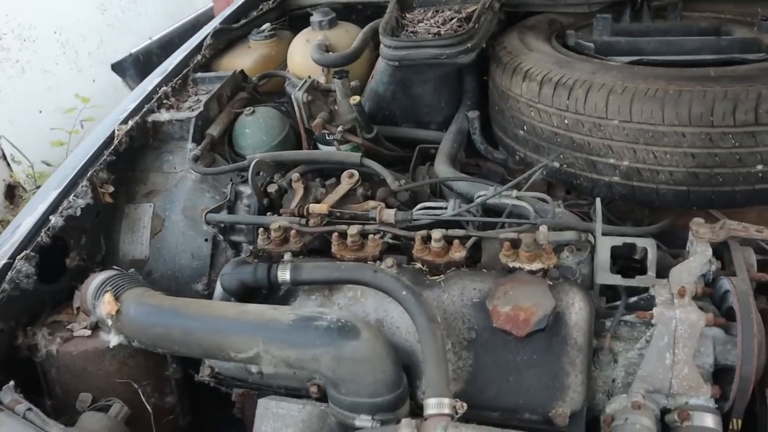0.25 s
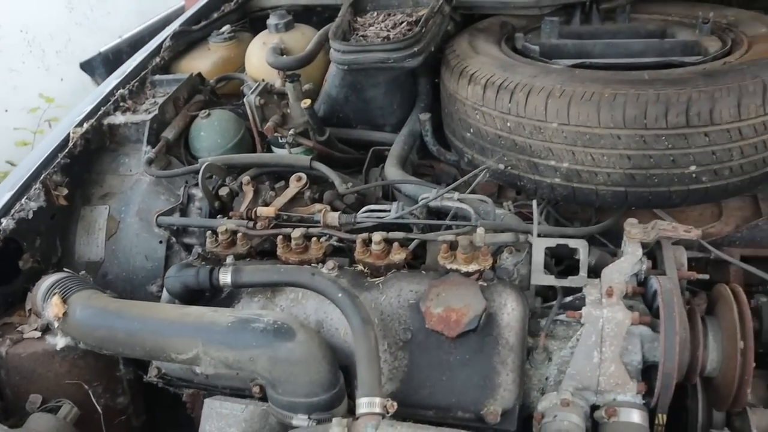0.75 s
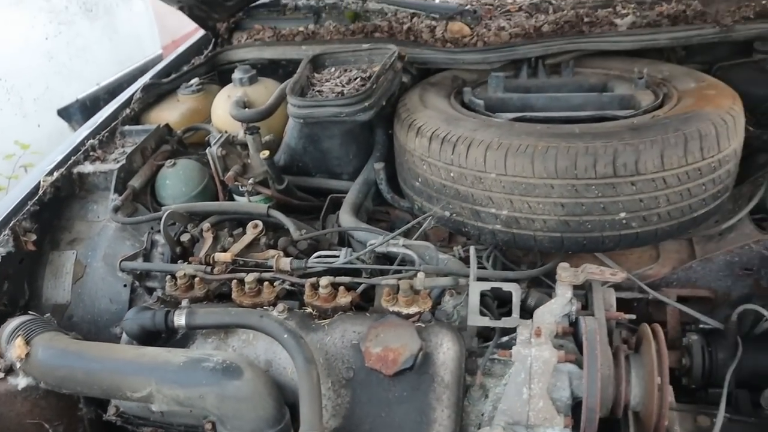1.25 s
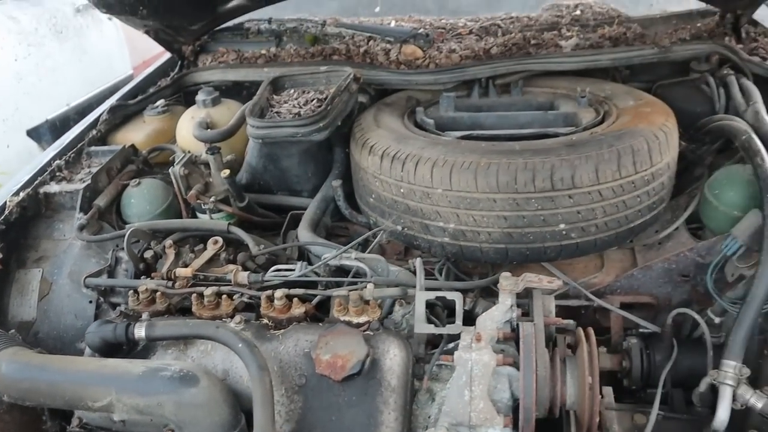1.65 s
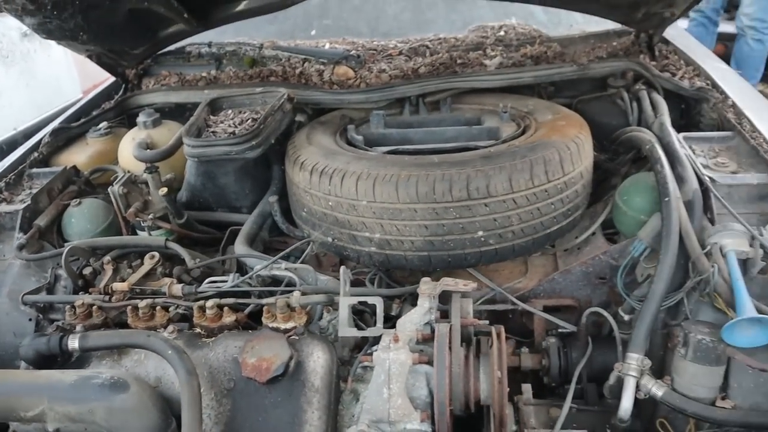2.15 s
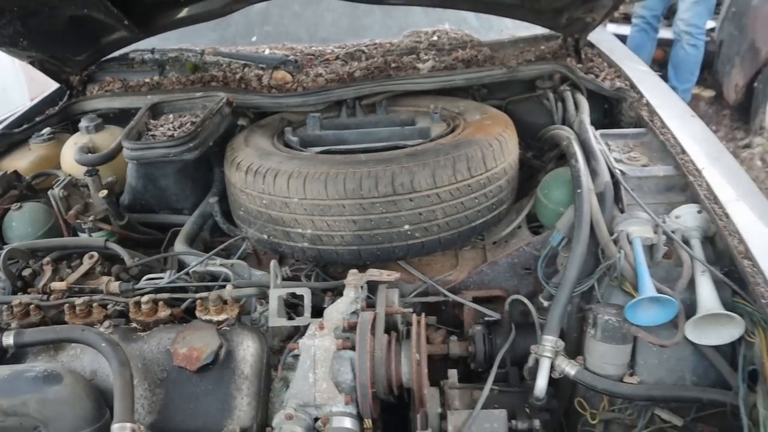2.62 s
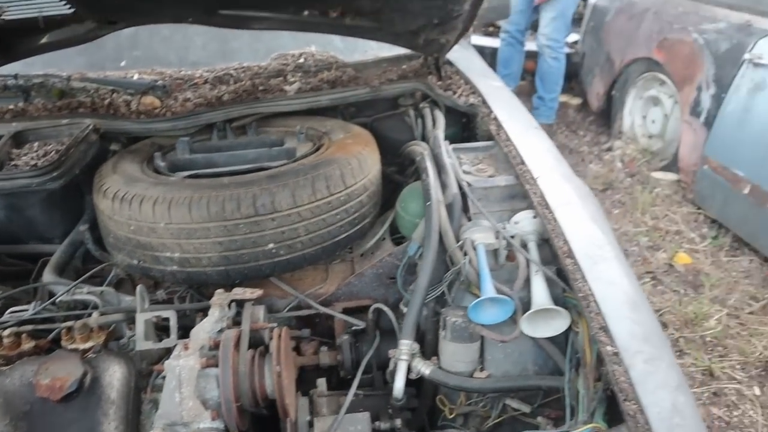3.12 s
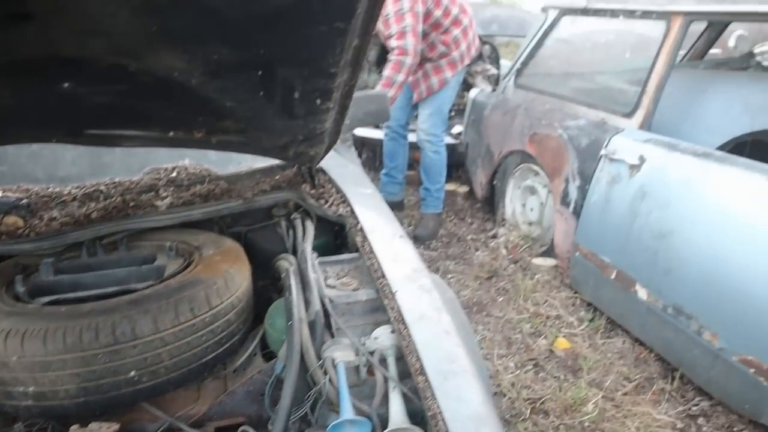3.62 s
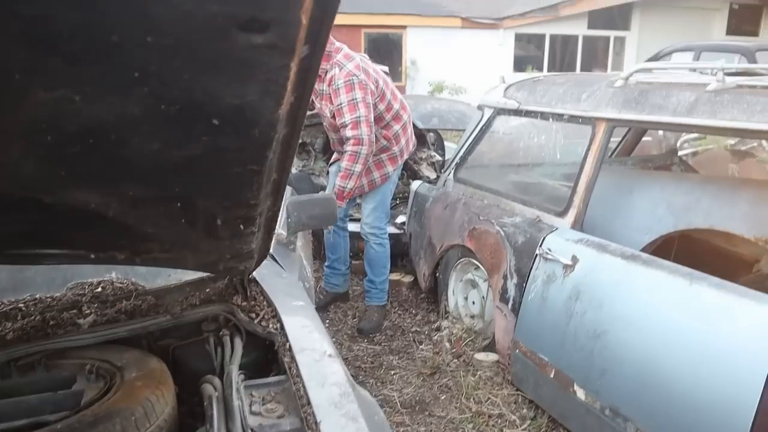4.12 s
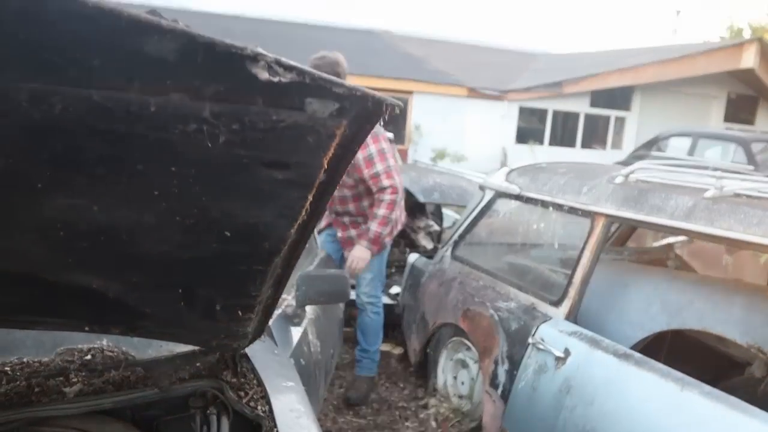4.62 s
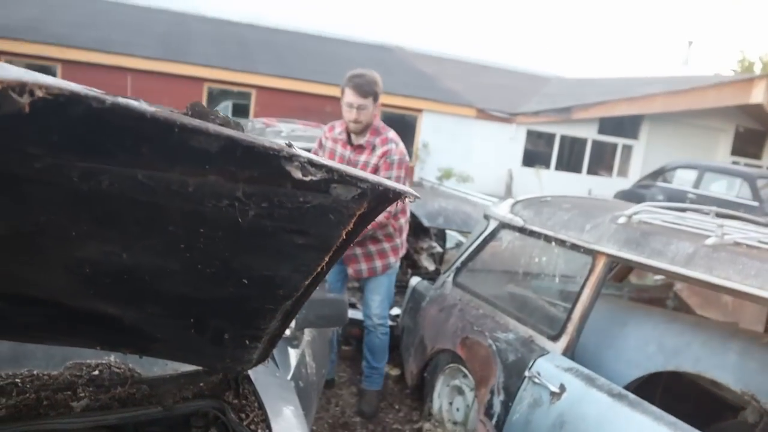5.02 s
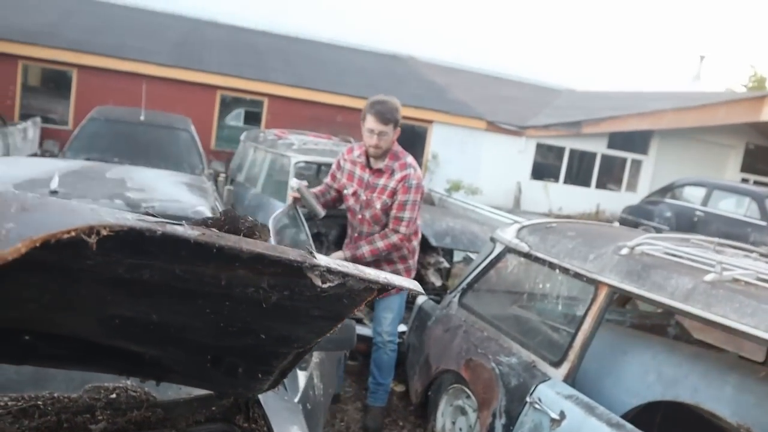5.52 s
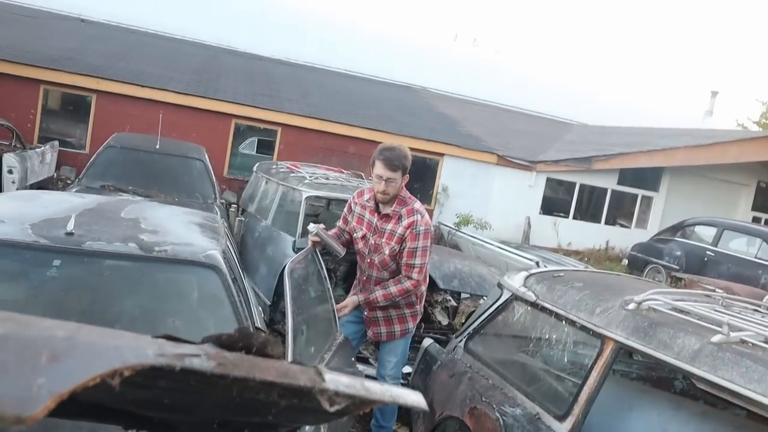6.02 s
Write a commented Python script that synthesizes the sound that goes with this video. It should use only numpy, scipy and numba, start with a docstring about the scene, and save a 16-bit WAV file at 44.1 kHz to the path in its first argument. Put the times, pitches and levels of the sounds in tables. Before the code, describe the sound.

In a quiet yard, a person wrestles a rusty car door, with hollow sheet-metal knocks, scuffs, one brief squeak, grassy steps and faint traffic rumble.

```python
"""Stiff car door in a yard

An old car door is worked open outdoors, a few metres away. Noise bursts of latch and hinge contacts ring
decaying sheet-metal modes; footfalls are soft resonant bumps with a crunch of dry grass. The hinge squeaks
once as a gliding tone with overtones, a dragging seal hisses as grainy filtered noise, grit ticks, and a far
bird and thin chirps whistle. Walls return a dull echo over the shaped noise of distant traffic."""
import sys
import numpy as np
from scipy import signal
from scipy.fft import rfft, irfft
from scipy.io import wavfile
from scipy.ndimage import uniform_filter1d
from numba import njit

SR = 44100
rng = np.random.default_rng(int(sys.argv[2]) if len(sys.argv) > 2 else 0)


def makeup_ratio(level_db):
    """Linear amplitude ratio for a level in decibels (20 dB per factor of ten)."""
    decades = np.asarray(level_db, float) / 20
    return 10 ** decades


def int16_out(signal):
    """Quantize to a 16-bit WAV file."""
    q = np.round(np.clip(np.atleast_2d(signal).T, -1, 1) * 32767)
    wavfile.write(sys.argv[1], SR, q.astype(np.int16))


N = 276066
T = np.arange(N) / SR


def unit(x):
    """Scale to rms 1."""
    return x / np.sqrt(np.mean(x ** 2))


def at_peak(x, db):
    """Scale by the loudest 9 ms: a steady sine there would peak at db."""
    return x * makeup_ratio(db) / np.sqrt(2 * uniform_filter1d(x ** 2, size=400).max())


def add(out, s, x):
    """Mix x in from time s."""
    i = int(s * SR)
    out[i:i + len(x)] += x[:N - i]


def colour(x, points):
    """Shape a noise by (Hz, dB) points, joined along log frequency."""
    hz, db = np.transpose(points)
    f = np.maximum(np.arange(len(x) // 2 + 1) * SR / len(x), 1)
    gain = makeup_ratio(np.interp(np.log(f), np.log(hz), db, left=-120))
    return irfft(rfft(x) * gain, len(x))


def band(x, hz, width):
    """Resonant band-pass."""
    return signal.lfilter(*signal.iirpeak(hz, hz / width, fs=SR), x)


def duller(x, hz, order):
    """Low-pass."""
    return signal.sosfilt(signal.butter(order, hz, fs=SR, output="sos"), x)


def decay(t, t60):
    """Exponential fall by 60 dB in t60 seconds."""
    return np.exp(-np.log(1000) * t / t60)


def walk(rate):
    """Slow random wander, smoothed from rate new values a second."""
    k = int(SR / rate)
    steps = np.repeat(rng.standard_normal(N // k + 1), k)
    return 1.3 * uniform_filter1d(uniform_filter1d(steps, k), k)[:N]


def level_curve(s, db):
    """Gain through (s, dB) points, silent outside them."""
    return makeup_ratio(np.interp(T, s, db, left=-120, right=-120))


def tone(table, orders):
    """A gliding pitch with overtones: the running sum of frequency gives the phase."""
    s, hz, db = np.transpose(table)
    phase = 2 * np.pi * np.cumsum(np.interp(T, s, hz)) / SR
    return level_curve(s, db) * sum(makeup_ratio(d) * np.sin(round(k) * phase) for k, d in orders)


def burst(t, rise, spread, grit):
    """Uneven contacts under a rise and a fall; rise is a fraction of the fall time spread, grit is in dB."""
    spread = max(spread, .001)
    shape = (1 - np.exp(-t / (rise * spread))) ** 2 * np.exp(-t / spread)
    return shape * rng.standard_normal(len(t)) * makeup_ratio(grit * rng.standard_normal(len(t)))


# Bands of the four layers of a blow: thud, panel, clank, crack.
# Each row: low edge in Hz, high edge in Hz.
LAYER_BANDS = [(72, 320), (300, 1450), (1450, 4000), (3800, 15000)]


def within(x, layer):
    """Keep one layer's band."""
    lo, hi = LAYER_BANDS[layer]
    high = signal.sosfilt(signal.butter(4, lo, "high", fs=SR, output="sos"), x)
    return duller(high, hi, order=2)


def echo(x, db, t60):
    """Walls and car sides return a dull wash: a softly starting, decaying noise tail."""
    t = T[:SR // 2]
    tail = rng.standard_normal(len(t)) * decay(t, t60) * (1 - np.exp(-t / 0.0043))
    tail = duller(tail, 2340, order=1)
    return makeup_ratio(db) * signal.fftconvolve(x, tail / np.sqrt(np.sum(tail ** 2)))[:N]


# Spectrum of the yard's background noise.
# Each row: frequency in Hz, relative power density in dB.
YARD_SPECTRUM = [(15, -44), (25, 3.5), (89, -2.5), (129, -11.5), (204, -1.5), (289, -6.5), (631, -9),
                 (684, -7), (997, -4.5), (2230, -17.5), (3260, -25), (3630, -26.5), (15500, -33.5)]
# Swell of the distant traffic. Each row: time in seconds, gain in dB.
TRAFFIC_SWELL = [(0, 0), (1, -0.5), (2, -1), (3, 0.5), (4, 0.5), (5, 0.5), (6.26, 2)]


def yard():
    """Distant traffic, the noise below 3 kHz, swells gently; the microphone hiss above it stays even."""
    noise = unit(colour(rng.standard_normal(N), YARD_SPECTRUM)) * makeup_ratio(-43.5)
    traffic = duller(noise, 3000, order=2)
    swell_db = np.interp(T, *np.transpose(TRAFFIC_SWELL)) + 0.2 * walk(12)
    return noise + traffic * (makeup_ratio(swell_db) - 1)


# Far bird's whistle. Each row: time in seconds, pitch in Hz, level in dB before the wavering.
BIRD_WHISTLE = [(3.7, 3310, -71), (3.8, 3270, -64), (3.93, 3220, -63), (4.04, 2990, -61), (4.15, 2940, -61),
                (4.19, 2930, -71)]


def bird():
    """A far whistle, one gliding sine, wavers in the moving air."""
    return tone(BIRD_WHISTLE, [(1, 0)]) * makeup_ratio(2.5 * walk(50))


# Two thin high chirps in the grass. Each row: time in seconds, pitch in Hz, level in dB before the wavering.
GRASS_CHIRPS = [(2.7, 11850, -72), (2.72, 11900, -59), (2.75, 11850, -62), (2.77, 11550, -74),
                (2.79, 12050, -64), (2.835, 12000, -63), (2.86, 11500, -70)]


def chirps():
    """Thin gliding sines high in the treble waver in the moving air."""
    return tone(GRASS_CHIRPS, [(1, 0)]) * makeup_ratio(2.5 * walk(50))


# Soft bumps and footfalls.
# Each row: start in seconds, bump level in dB, centre in Hz, crunch level in dB, fall time in seconds.
SOFT_BUMPS = [(1.49, -37, 406, -74, 0.022), (1.915, -40, 745, -62, 0.0083),
              (2.408, -35.5, 1010, -65, 0.0085), (2.424, -31.5, 1020, -64, 0.0081),
              (2.447, -34.5, 1200, -44.5, 0.011), (2.458, -37.5, 405, -60, 0.021),
              (2.575, -35.5, 363, -64, 0.017), (2.791, -32.5, 900, -61, 0.021),
              (2.821, -33.5, 414, -53, 0.0071), (2.896, -38.5, 385, -49.5, 0.018),
              (2.98, -32.5, 400, -48, 0.019), (3.032, -36.5, 463, -70, 0.011),
              (3.351, -35.5, 327, -64, 0.017), (3.499, -41, 500, -44.5, 0.011),
              (4.01, -36.5, 910, -58, 0.034), (4.037, -46, 850, -41, 0.0044),
              (4.555, -30, 335, -44.5, 0.02), (5.149, -42, 1310, -47, 0.03), (6.228, -38, 816, -56, 0.0042)]


def bumps():
    """Each soft contact has one broad resonance, a thud in the ground and a crunch of dry grass."""
    out, t = np.zeros(N), T[:8192]
    for s, db, hz, crunch_db, spread in SOFT_BUMPS:
        contacts = burst(t, 0.27, spread, 5.6)
        thud_db = db - 8.5 - 5 * np.log2(hz / 400)  # higher bumps thud less, by 5 dB an octave
        bump = band(band(contacts, hz, hz / 3), hz, hz / 0.59)
        thud = band(within(contacts, 0), 132, 37)
        crunch = band(contacts, 2000, 3800)
        for part, part_db in ((bump, db), (thud, thud_db), (crunch, crunch_db)):
            add(out, s, at_peak(part, part_db))
    return out


# Tiny dry ticks. Each row: start in seconds, peak level in dB, centre in Hz.
DRY_TICKS = [(0.0574, -39, 7000), (0.226, -40, 3700), (0.3301, -41, 4240), (1.551, -31, 10400),
             (1.559, -32, 8600), (3.5498, -39, 4690), (3.841, -43, 4760), (4.777, -34, 8760),
             (4.8352, -31, 12500), (5.2374, -40, 8400), (5.9396, -34.5, 7700), (6.048, -35, 8400),
             (6.064, -41, 3680), (6.1, -40, 8400), (6.172, -28.5, 8240)]


def ticks():
    """Grit snaps: a millisecond or so of noise in a wide resonance."""
    out, t = np.zeros(N), T[:1024]
    # six faint ones scattered by chance: -47 to -43 dB, half an octave either side of 5 kHz
    faint = [(a * T[-1], -47 + 4 * b, 5000 * 2 ** (c - .5)) for a, b, c in rng.random((6, 3))]
    for s, db, hz in DRY_TICKS + faint:
        snap = band(rng.standard_normal(len(t)) * np.exp(-t / 0.0016), hz, hz / 4.8)
        add(out, s, snap * makeup_ratio(db) / np.abs(snap).max())
    return out


# The dragging seal sets in, presses harder, lets go and trails off.
# Each row: time in seconds, level in dB.
SEAL_PRESSURE = [(4.82, -60), (4.84, -49.5), (4.9, -45), (5.02, -45.5), (5.158, -33.5), (5.168, -54),
                 (5.4, -55.5)]
# Resonances of the seal's hiss.
# Each row: centre in Hz, width of the first of two filters in Hz, gain in dB before the hiss is levelled.
SEAL_RESONANCES = [(8220, 2100, -9), (11100, 3500, -11), (4070, 9300, -12.5)]


def drag():
    """The seal's fine stick-slip grains and sudden slips sound in broad high resonances."""
    slips_per_s, slip_db, slip_s = 120, -1, .002  # slip_s is the decay time
    slips = (rng.random(N) < slips_per_s / SR) * rng.exponential(size=N)
    slips = signal.lfilter([1], [1, -np.exp(-1 / (slip_s * SR))], slips)
    grains = rng.standard_normal(N) * makeup_ratio(1.5 * walk(40)) * (1 + makeup_ratio(slip_db) * slips)
    hiss = sum(makeup_ratio(d) * band(band(grains, hz, w), hz, 1.56 * w) for hz, w, d in SEAL_RESONANCES)
    return unit(hiss) * level_curve(*np.transpose(SEAL_PRESSURE))


# Hinge squeak. Each row: time in seconds, pitch in Hz, level in dB before the overtone gains.
HINGE_GLIDE = [(3.193, 2220, -42), (3.2, 2260, -17.5), (3.2065, 2262, -17), (3.2125, 2390, -23),
               (3.217, 2230, -22), (3.227, 2050, -29), (3.234, 1960, -48)]
# Overtones of the squeak. Each row: multiple of the pitch, gain in dB.
HINGE_OVERTONES = [(1, -0.5), (2, -19.5), (3, -20.5), (4, -28.5), (5, -30)]
# Reflections of the squeak. Each row: delay in seconds, gain in dB before dulling.
HINGE_REFLECTIONS = [(.01323, -5), (.030, -14), (.045, -16), (.062, -21), (.12, -28), (.138, -27),
                     (.157, -21), (.18, -28)]


def squeak():
    """The gliding squeak beats against its first reflection and hangs in the yard as a thin wash."""
    direct = tone(HINGE_GLIDE, HINGE_OVERTONES)
    slaps = np.zeros(N)
    for s, db in HINGE_REFLECTIONS:
        dulled = duller(direct, 5000 if s < .02 else 2800, order=2)  # later reflections are duller
        slaps += makeup_ratio(db) * np.roll(dulled, int(s * SR))
    return direct + slaps + echo(direct, db=-24, t60=.35)


# Modes of the door panel and latch, before each blow's scatter.
# Each row: frequency in Hz, relative level in dB, 60 dB decay time in seconds.
PANEL_MODES = [(90.1, 1.5, 0.16), (144.8, 3.5, 0.12), (236.3, 5, 0.084), (295, -8, 0.13),
               (432.7, -0.5, 0.078), (498, -3.5, 0.066), (586, -7.5, 0.049), (684, -0.5, 0.043),
               (753.5, 7.5, 0.032), (832.6, -1.5, 0.12), (959.6, -5.5, 0.1), (1075, -3.5, 0.021),
               (1310, -3, 0.038), (1457, -3.5, 0.034), (1541, 5, 0.045), (1840, 3.5, 0.023),
               (1962, 4, 0.04), (2095, 0.5, 0.038), (2287, -2.5, 0.04), (2828, 6.5, 0.0097),
               (3000, 4.5, 0.0055), (3565, 4, 0.015)]
# Crowd of unresolved modes in the thud, panel and clank bands.
# Each row: starting level in dB, 60 dB decay time in seconds.
MODE_CROWD = [(2, 0.3), (4, 0.1), (8, 0.026)]


def panel_rings(scatter_db):
    """Thud, panel and clank responses to one contact; each blow lands elsewhere and bends the sheet a little."""
    t = T[:16384]
    hz, db, t60 = np.array(PANEL_MODES).T[:, :, None]
    spot, bend, turn = rng.standard_normal((3, len(PANEL_MODES), 1))
    bent_hz = hz * (1 + 0.026 * bend)
    rings = makeup_ratio(db + scatter_db * spot) * np.sin(2 * np.pi * bent_hz * t) * decay(t, t60)
    rings = rings * np.sign(turn)  # each mode starts in or out of phase
    layer_of = np.digitize(hz[:, 0], [LAYER_BANDS[1][0], LAYER_BANDS[2][0]])
    responses = []
    for layer, (crowd_db, crowd_t60) in enumerate(MODE_CROWD):
        crowd = unit(within(rng.standard_normal(len(t)), layer)) * makeup_ratio(crowd_db) * decay(t, crowd_t60)
        responses.append(within(rings[layer_of == layer].sum(axis=0) + crowd, layer))
    return responses


# The door shudders on its hinges.
# Each row: start of the hold in seconds, hold in seconds, thud level in dB, panel level in dB.
HINGE_SHUDDERS = [(0.503, 0.05, -52, -32), (0.66, 0.16, -35, -40), (1.56, 0.015, -42, -43.5),
                  (1.73, 0.15, -44.5, -48.5), (3.493, 0.03, -37.5, -41), (4.203, 0.17, -42, -34),
                  (4.42, 0.12, -42.5, -45)]


def shudders():
    """Rough rubbing sets in, holds and dies away in the low and middle modes."""
    rise_db_per_s, fall_db_per_s = 600, 152
    rub = rng.standard_normal(N) * makeup_ratio(1.6 * walk(55))
    thud, panel = (unit(signal.fftconvolve(rub, ring)[:N]) for ring in panel_rings(0)[:2])
    out = np.zeros(N)
    for s, hold, thud_db, panel_db in HINGE_SHUDDERS:
        rise_db = rise_db_per_s * np.minimum(T - s, 0)
        fall_db = fall_db_per_s * np.maximum(T - s - hold, 0)
        out += makeup_ratio(rise_db - fall_db) * (thud * makeup_ratio(thud_db) + panel * makeup_ratio(panel_db))
    return out


def blows(table, rise, grit, first_db, heavy_s):
    """A first contact, its rebound and chatter ring the panel, with a noisy crack on top."""
    out, t = np.zeros(N), T[:16384]
    for s, panel_db, thud_db, clank_db, crack_db, spread in table:
        contacts = burst(t, rise, spread, grit)
        # only the early, heavy contacts move the large low modes
        heavy = contacts * np.exp(-t / heavy_s)
        heavy[:12] += makeup_ratio(first_db) * np.hanning(12)
        # every blow springs back once, 6.89 ms later
        rebound = burst(t, rise, spread, grit) * np.exp(-t / heavy_s)
        add(heavy, 0.00689, makeup_ratio(-3) * rebound[:8192])
        # loose parts start to rattle a moment later
        light = contacts * (1 - np.exp(-t / 0.0032))
        pushes = zip((heavy, heavy, light), panel_rings(3.2))
        thud, panel, clank = (signal.fftconvolve(push, ring)[:len(t)] for push, ring in pushes)
        crack = duller(within(light, 3), 5850, order=1)
        # a soft blow that hardly clanks also leaves the upper panel modes quiet
        soft_hz = np.clip(1630 * 2 ** ((clank_db - panel_db + 23.5) / 16), 400, 8000)
        panel = duller(panel, soft_hz, order=2)
        for part, part_db in ((thud, thud_db), (panel, panel_db), (clank, clank_db), (crack, crack_db)):
            add(out, s, at_peak(part, part_db))
    return out


# The latch knocks against the panel. Each row: start in seconds, panel level in dB, clank level in dB,
# crack level in dB, chatter fall time in seconds.
LATCH_KNOCKS = [(0.636, -33, -47, -41.5, 0.0036), (0.706, -4.5, -15.5, -19.5, 0.0072),
                (0.725, -18.5, -43, -41, 0.0065), (0.771, -18, -25, -22.5, 0.0044),
                (1.015, -26.5, -32, -53, 0.007), (1.075, -1.5, -16.5, -32, 0.0076),
                (1.092, -14, -34, -48, 0.0033), (1.104, -7, -30, -41, 0.01),
                (1.116, -10.5, -25, -31.5, 0.0048), (1.14, -30, -62, -57, 0.0074),
                (1.587, -26, -27.5, -31, 0.0095), (1.619, -16.5, -16, -19.5, 0.0068),
                (4.252, -22, -13.5, -21, 0.0068), (4.302, -28, -34, -41, 0.0062),
                (4.35, -36, -29.5, -42, 0.0048), (4.371, -21.5, -21.5, -31.5, 0.0095),
                (4.543, -24.5, -37.5, -48, 0.0036), (4.888, -21, -46, -61, 0.02),
                (4.974, -35, -49, -54, 0.0087), (5.03, -10, -25, -33.5, 0.014),
                (5.569, -18, -29, -54, 0.0081), (5.657, -4, -29.5, -46, 0.0098),
                (5.666, -10, -26.5, -39, 0.015), (5.674, -9.5, -21.5, -25.5, 0.0054),
                (5.694, -21, -41, -67, 0.013), (6.194, -23, -41, -62, 0.0079),
                (6.251, -9, -17, -26.5, 0.02)]
# The whole door thumps dully on its hinges. Each row: start in seconds, panel level in dB, thud level in dB,
# chatter fall time in seconds.
DOOR_THUMPS = [(0.483, -21, -17.5, 0.038), (0.546, -46, -16, 0.013), (0.706, -29, -15.5, 0.0079),
               (0.736, -38, -30, 0.023), (1.098, -33, -15, 0.0091), (1.587, -43, -23, 0.01),
               (1.754, -34.5, -27.5, 0.008), (1.775, -52, -33.5, 0.0073), (1.859, -41, -38, 0.0049),
               (3.459, -56, -30.5, 0.017), (4.2, -15, -14.5, 0.022), (4.303, -47, -34, 0.006),
               (4.349, -43, -29.5, 0.013), (4.374, -39, -29, 0.009)]
# Scuffs that swell and fade. Each row: start in seconds, panel level in dB, thud level in dB,
# clank level in dB, fall time in seconds.
DOOR_SCUFFS = [(0.524, -29, -51, -23.5, 0.0097), (0.561, -45, -29, -41.5, 0.015),
               (0.648, -36, -33, -31.5, 0.0093), (1.63, -32, -34, -43, 0.012),
               (2.001, -40, -43, -47, 0.019), (4.222, -15.5, -14, -34.5, 0.017),
               (4.271, -26.5, -27, -31.5, 0.011), (4.291, -35, -32, -37.5, 0.017),
               (4.325, -38, -47, -48, 0.013), (4.418, -54, -40.5, -49, 0.045)]


def door():
    """Knocks, thumps and scuffs all ring the same panel; the levels not in a table follow another layer."""
    knocks = [(s, p, p - 21, clank, crack, c) for s, p, clank, crack, c in LATCH_KNOCKS]
    thumps = [(s, p, thud, p - 37, p - 31, c) for s, p, thud, c in DOOR_THUMPS]
    scuffs = [(s, p, thud, clank, clank - 5, c) for s, p, thud, clank, c in DOOR_SCUFFS]
    hard = blows(knocks + thumps, rise=0.034, grit=4.5, first_db=19.0, heavy_s=0.016)
    return hard + blows(scuffs, rise=1.2, grit=3.5, first_db=-30., heavy_s=.1)


def scene():
    """Near sources with their echo over the yard."""
    near = door() + bumps()
    sources = near + echo(near, db=-20.5, t60=0.23)
    sources = sources + squeak() + shudders() + ticks() + drag() + chirps() + bird()
    # the microphone port dips near 10 kHz, ahead of the even hiss
    port_dip = 0.61 * band(sources, 10650, 5100)
    return (sources - port_dip + yard())[None]


@njit
def follow(x, attack, release):
    """Level follower: quick up, slow down."""
    e, out = 0., np.empty(len(x))
    for i in range(len(x)):
        e += (abs(x[i]) - e) * (attack if abs(x[i]) > e else release)
        out[i] = e
    return out


def roll_off(x):
    """The treble ends steeply here."""
    return signal.sosfilt(signal.butter(12, 15720, fs=SR, output="sos"), x)


def record(dry):
    """Gain control ducks a few dB after loud blows and creeps back; peaks beyond full scale clip."""
    attack_s, release_s, threshold_db = .025, .3, -26.5
    heard = follow(dry[0], 1 / (attack_s * SR), 1 / (release_s * SR))
    gain = np.maximum(heard / makeup_ratio(threshold_db), 1) ** -.2
    mix = np.clip(dry * gain, -1, 1)
    return roll_off(mix)


dry = scene()
out = record(dry)
int16_out(out)
```